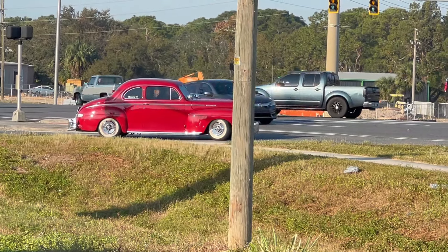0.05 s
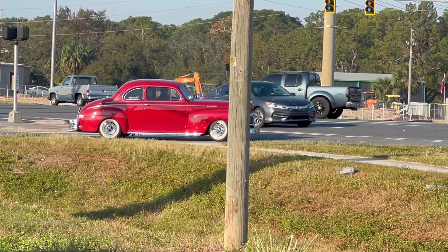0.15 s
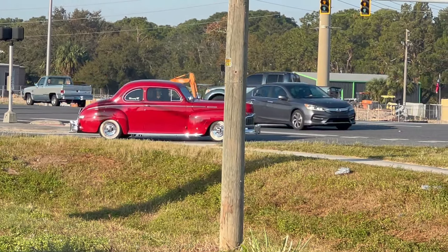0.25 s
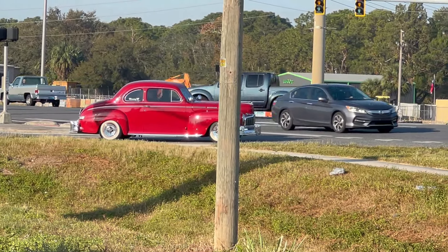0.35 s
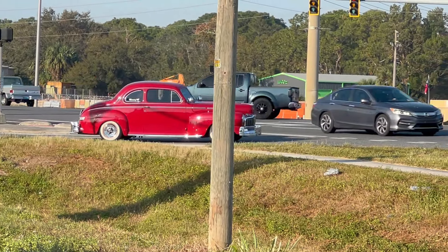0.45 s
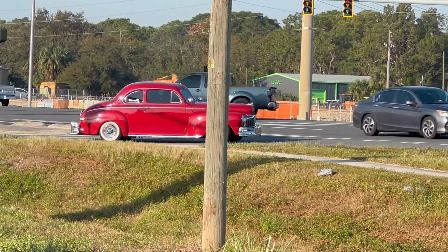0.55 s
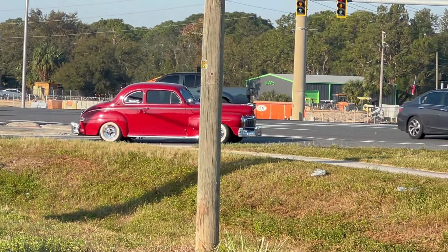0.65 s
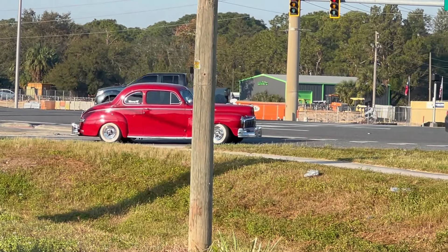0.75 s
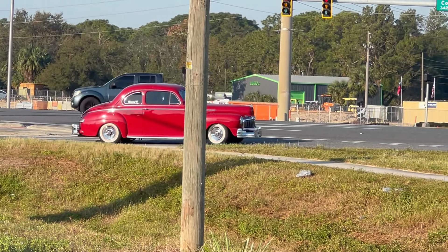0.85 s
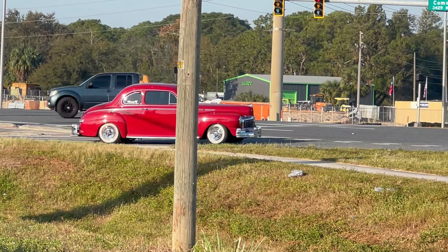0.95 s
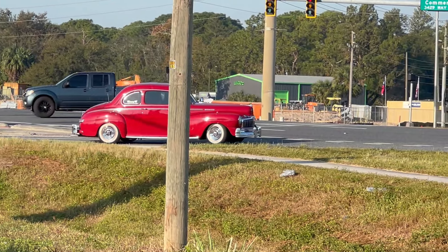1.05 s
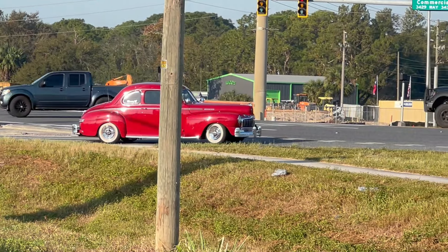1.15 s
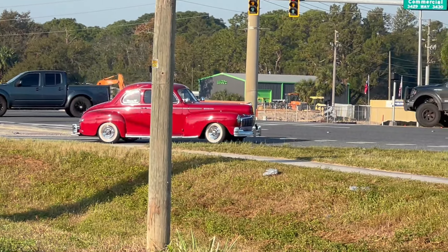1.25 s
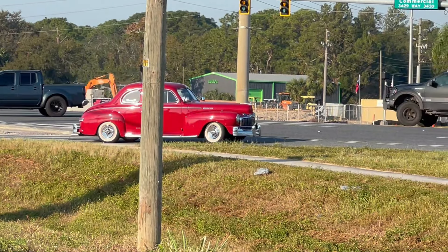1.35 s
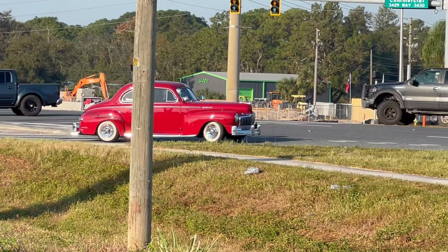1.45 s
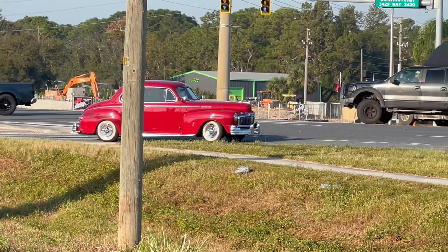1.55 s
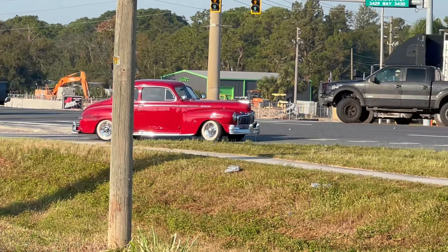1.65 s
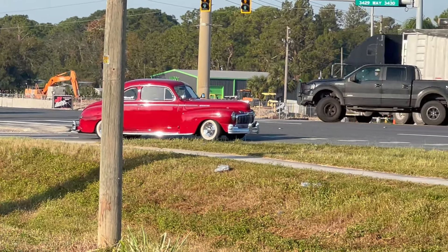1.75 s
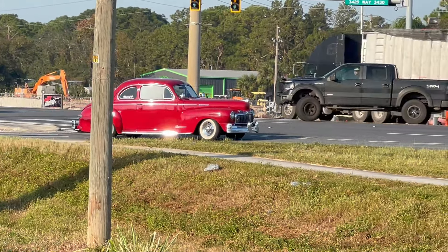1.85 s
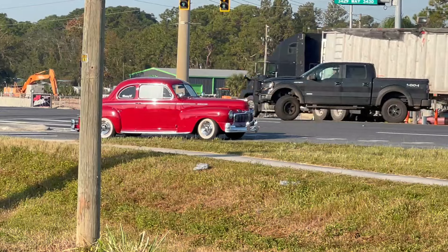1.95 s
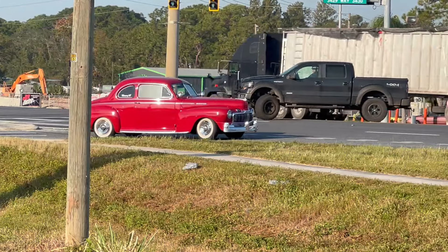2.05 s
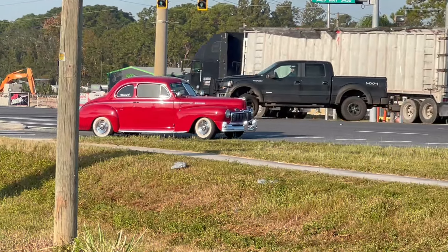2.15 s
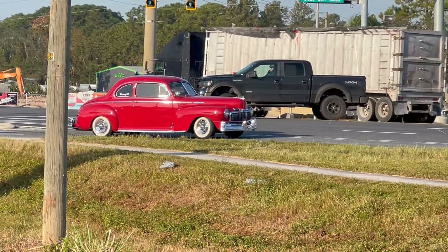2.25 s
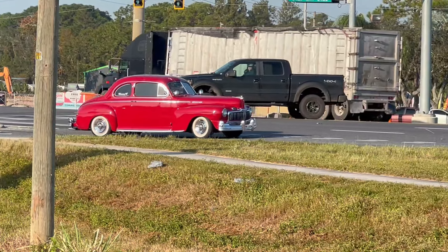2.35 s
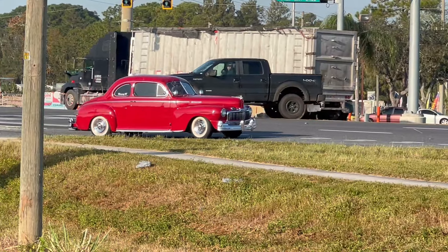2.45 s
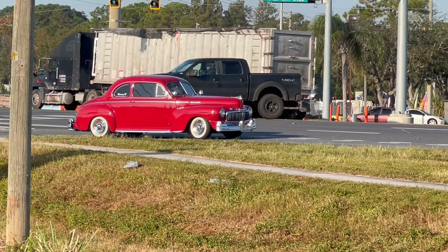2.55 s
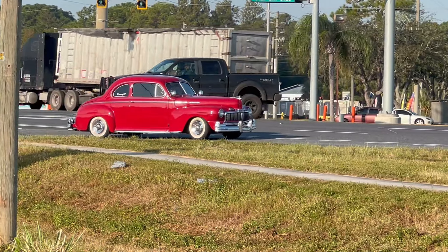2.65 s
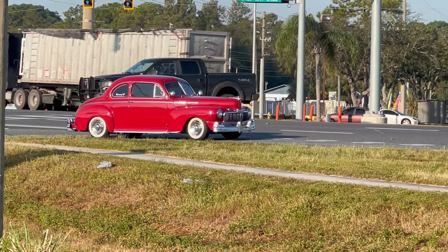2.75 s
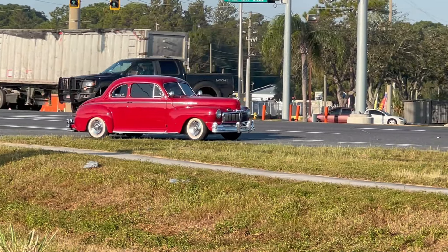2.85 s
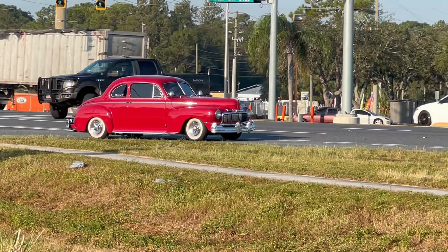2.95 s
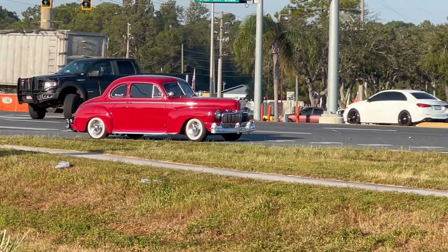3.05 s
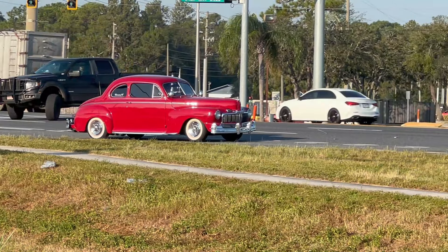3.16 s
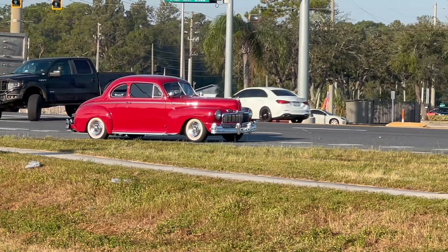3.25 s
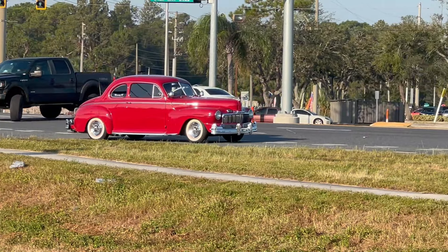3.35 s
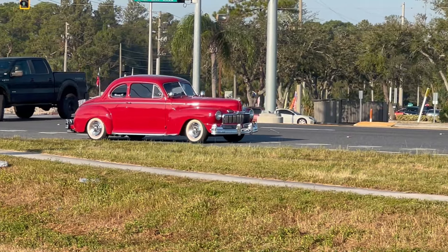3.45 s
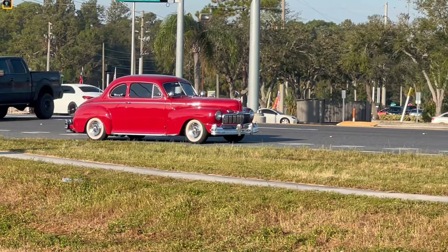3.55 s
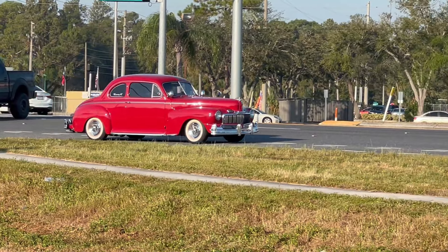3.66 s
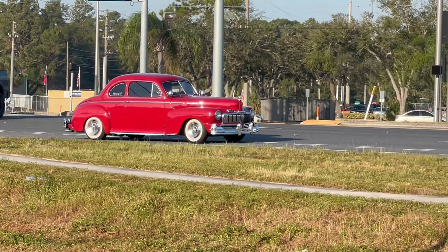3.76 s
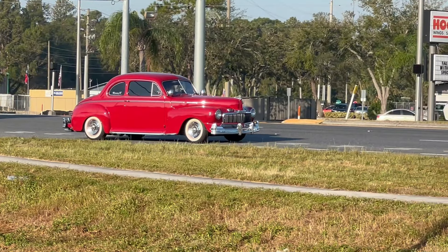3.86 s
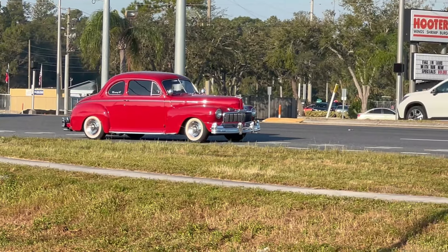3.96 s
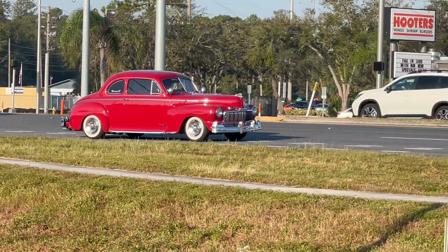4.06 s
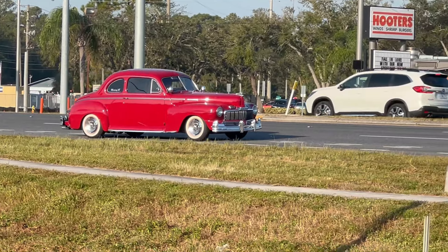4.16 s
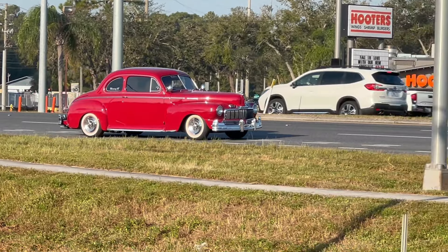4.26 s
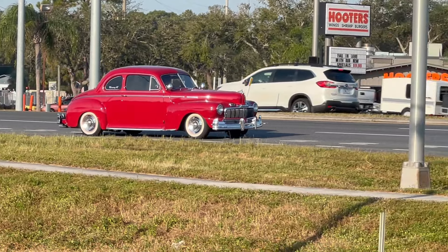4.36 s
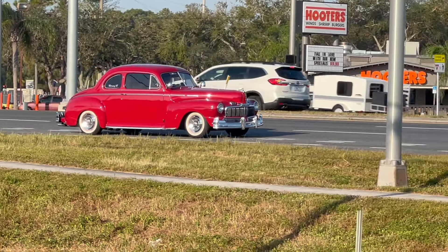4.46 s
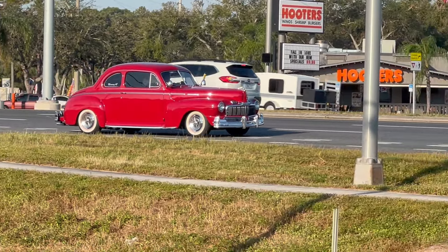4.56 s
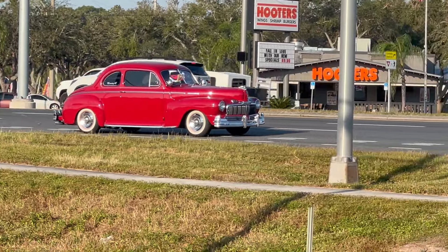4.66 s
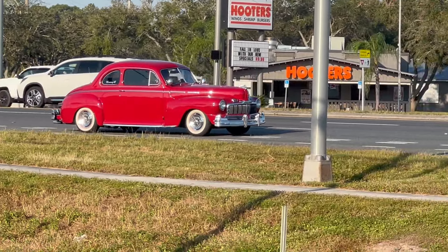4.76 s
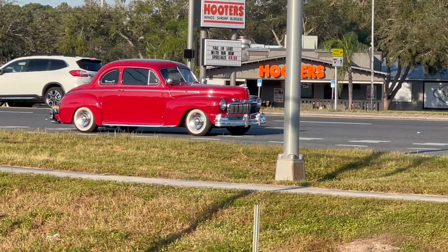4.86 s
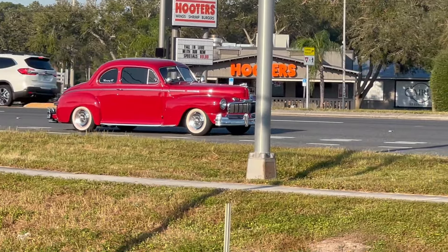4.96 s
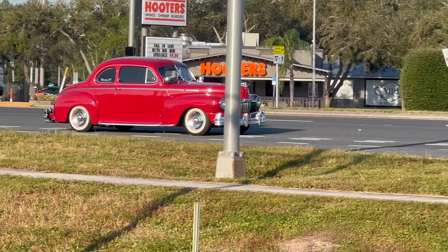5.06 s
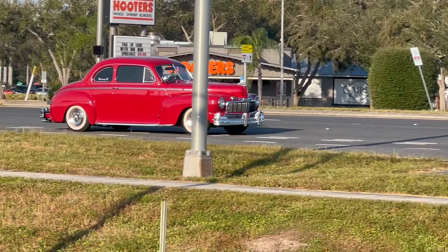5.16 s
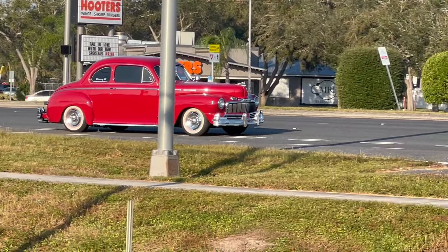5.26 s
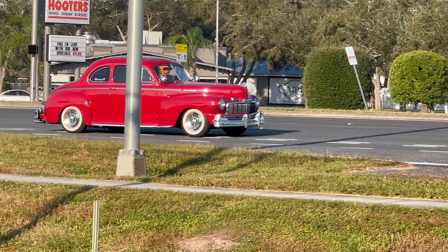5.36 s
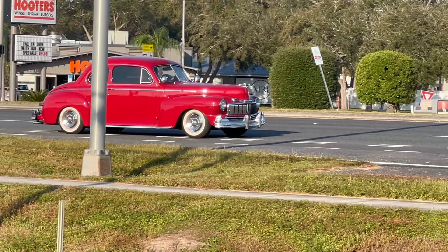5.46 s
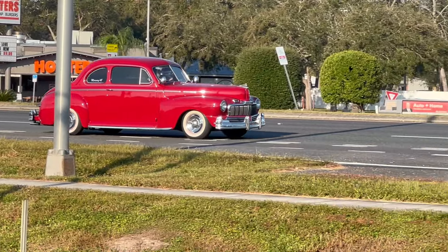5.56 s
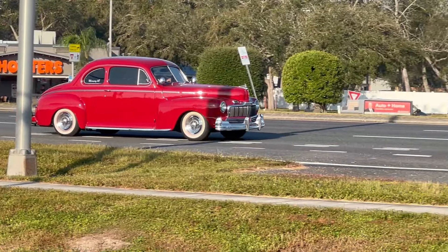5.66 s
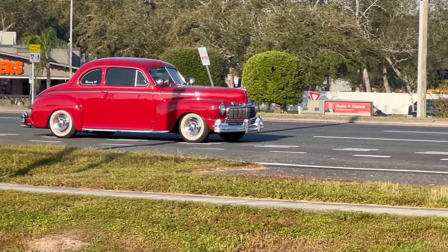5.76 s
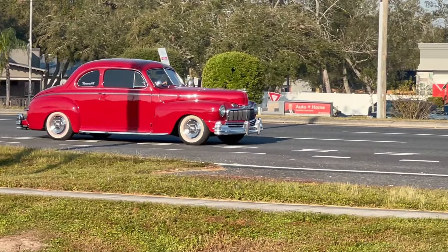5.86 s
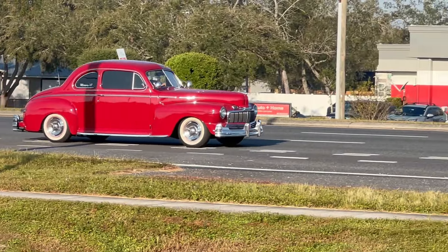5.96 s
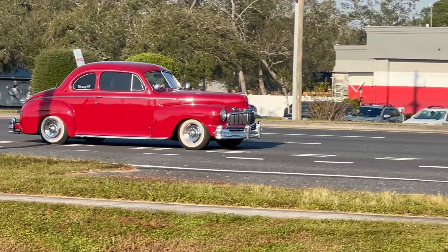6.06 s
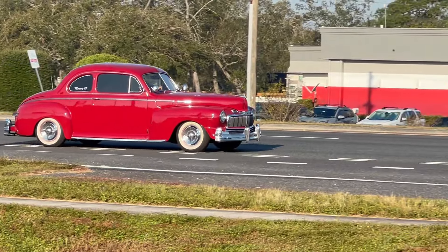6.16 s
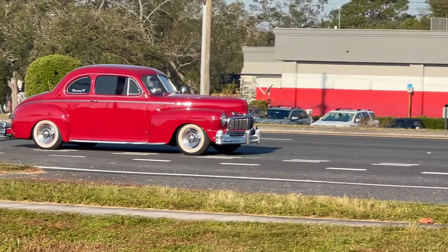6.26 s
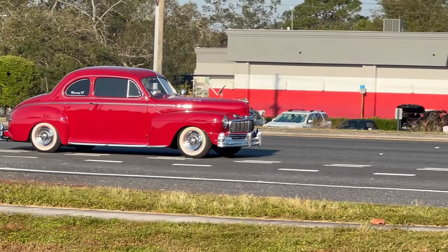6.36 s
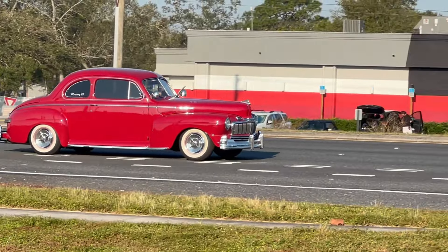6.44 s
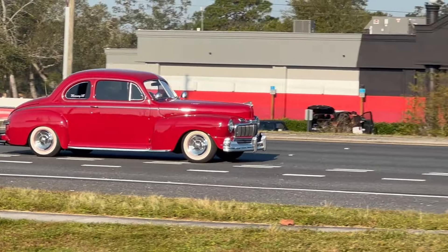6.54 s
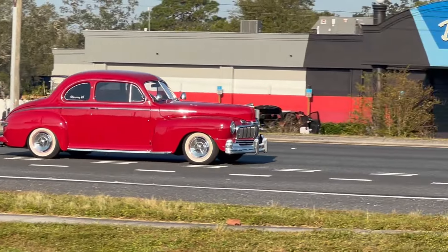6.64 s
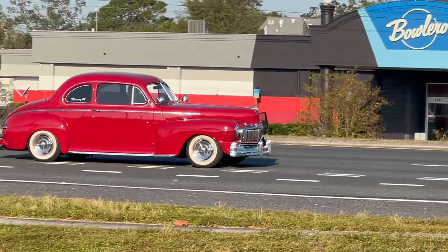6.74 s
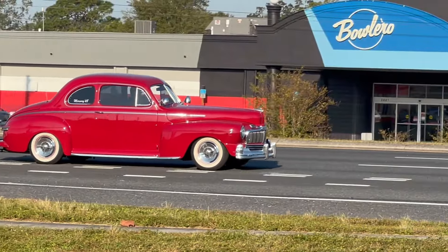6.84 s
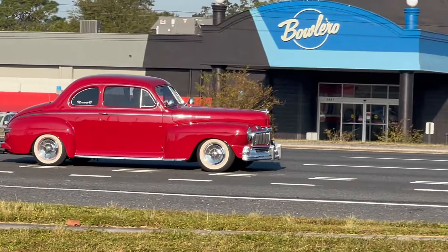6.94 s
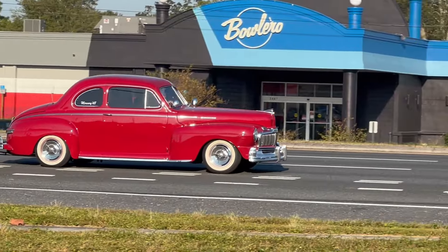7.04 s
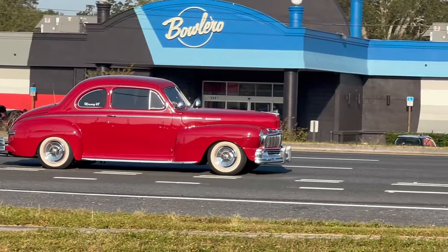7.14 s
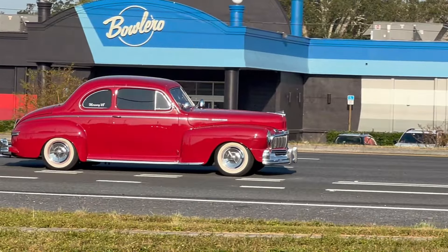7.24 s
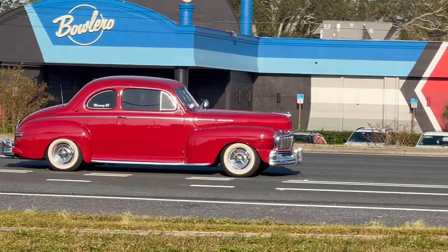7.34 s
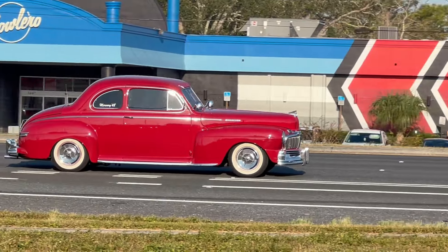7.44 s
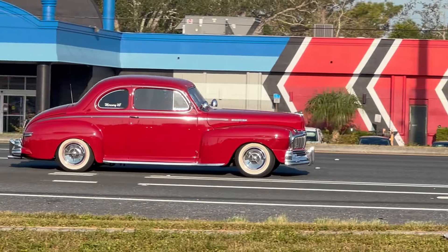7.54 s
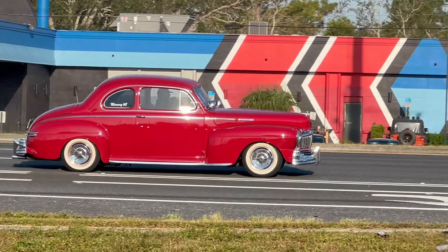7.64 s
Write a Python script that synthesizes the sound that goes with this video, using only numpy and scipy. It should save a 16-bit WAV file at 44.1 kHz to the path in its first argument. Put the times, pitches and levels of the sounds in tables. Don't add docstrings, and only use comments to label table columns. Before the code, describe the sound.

Open-air busy road, heard from the grass verge through a small stereo phone. From 0 s vehicles cross in broad low whooshes, around 0.2, 1, 1.9 and more faintly 3.1 and 4.3 s, with lorry hums, a tiny belt squeak at the start, jingling loose metal, fine chain ticks and dull wheel thuds near 0.75, 1.0, 3.4 and 3.5 s, the later ones leftward. An old eight-cylinder car burbles softly underneath, then opens its throttle at about 2.4 s; the deep boom climbs, dips around 4.1 s, climbs again to 5.4 s, dips briefly and rises. The rattles clear after 4 s and fine tyre fizz grows around 5 s. Near 5.9 s the exhaust turns toward us: rapid uneven cracks, sharpest at 6.1 s, then duller, with a hollow bark. Another engine's low drone climbs behind from 5 s. Everything is loudest and nearest at about 7.7 s, without fading.

```python
import sys
import numpy as np
from scipy import signal
from scipy.fft import rfft, irfft, next_fast_len
from scipy.io import wavfile
from scipy.ndimage import uniform_filter1d

SR = 44100
rng = np.random.default_rng(int(sys.argv[2]) if len(sys.argv) > 2 else 0)


def dump(signal):
    limited = np.clip(np.atleast_2d(signal).T, -1, 1)
    pcm = np.round(limited * 32767).astype(np.int16)
    wavfile.write(sys.argv[1], SR, pcm)


def how_loud(loudness_db):
    steps = np.asarray(loudness_db, float) / 20
    return 10 ** steps


N = 339570

# pitch_hz, level_db
RUMBLE = [(25, -32), (40, -1), (55, 18.5), (100, 9.5), (170, 3), (230, -10), (400, -4.5), (700, -32.5),
          (1000, -65)]
ROAR = [(150, -37), (250, -18), (267, -21), (302, -30), (372, -9), (402, -3), (611, -0.5), (738, -2.5),
        (994, -4.5), (2630, -27), (3500, -46), (4550, -41), (7700, -120)]
HISS = [(1500, -25), (2500, -5), (3400, 3.5), (4500, -6), (6000, -5.5), (7400, -3), (8500, -2), (10000, -1),
        (12000, -57), (15000, -27)]
FIZZ = [(7000, -2.5), (9000, 0.5), (10500, 1), (12000, -2.5), (13500, -4.5), (15500, -5), (16500, -48)]
# pitch_hz, likeness
SAME = [(60, 1.), (250, .97), (500, .62), (1000, .7), (1750, .88), (5000, .9), (8000, .85), (14600, .75)]
# nearest_s, passing_time_s, roar_db
PASSES = [
    (.2, 0.54, -36),
    (.95, 0.46, -34.5),
    (1.9, 0.92, -34),
    (3.1, 0.49, -41),
    (4.3, 0.88, -43),
]
FAR_ROAR_DB = -41
OWN_ROAR_DB, OWN_SHARE = -36, 1
RUMBLE_DB, RUMBLE_SHARE, RUMBLE_PASS_SHARE = -41.5, .1, .35
HISS_DB, HISS_SHARE = -47.5, 0.56
FIZZ_DB, FIZZ_RISE_DB, FIZZ_S, FIZZ_SPAN_S = -65.5, 12.5, 5.14, 0.41

# start_s, end_s, pitch_hz, width_hz, level_db
HUMS = [
    (0, 1.6, 48, 0.24, -28.5),
    (3, 4.2, 43, 2, -31),
    (0, 0.59, 61, 2.8, -36),
    (.8, 1.44, 55, 1.4, -28.5),
    (1.42, 2.6, 55, 2.6, -28),
    (.4, 1, 134, 1.7, -45),
    (0, 0.69, 405, 3.2, -41.5),
    (0.93, 2.25, 598, 25, -42.5),
    (0.1, 0.63, 9700, 66, -77),
    (0.76, 1.2, 15000, 300, -76),
]
# start_s, end_s, pitch_hz, width_hz, level_db
RUSTLE = [
    (3.62, 4.02, 3450, 350, -54),
    (3.72, 3.87, 3100, 1000, -50),
    (2.2, 2.6, 3900, 1800, -53),
    (2.9, 3, 3500, 1400, -57),
    (1.2, 2.2, 4100, 670, -56.5),
    (1.1, 1.19, 6100, 1000, -54),
    (1.7, 2.4, 1950, 300, -51.5),
    (2.7, 3.35, 4500, 360, -55.5),
]
# pitch_hz, width_hz, level_db
CRACKLE = [(2900, 340, -6), (3500, 600, 1), (5200, 1200, -4)]
CRACKLE_PER_S, CRACKLE_DB = 90, -61.5
# pitch_hz, width_hz, level_db
GRIT = [(12300, 1500, -3), (14000, 1800, -2)]
GRIT_PER_S, GRIT_DB = 90, -9

# start_s, peak_db, pitch_hz
TICKS = [(0.1491, -37, 6460), (0.3205, -41, 4530), (0.6619, -41, 4590), (0.7433, -38, 4300),
         (0.9882, -37, 5140), (1.0315, -31, 6450), (1.0345, -39.5, 4900), (1.0745, -36.5, 5500),
         (1.1414, -49, 4440), (1.283, -42, 6110), (1.954, -41, 5750), (1.994, -44, 5150),
         (2.2029, -39, 4760), (2.286, -36, 4780), (2.3701, -37, 5100), (2.41, -37, 5800),
         (2.4933, -36, 5520), (2.9931, -41, 4960), (3.034, -39, 5400), (3.1164, -42, 4740),
         (3.2825, -41, 5220), (3.3039, -37, 5270), (3.3229, -41, 5450), (3.7399, -42, 4710),
         (3.7804, -38, 4600), (3.7988, -35, 5100), (3.8632, -39, 4900)]
# start_s, peak_db, pitch_hz
CLINKS = [(0.038, -26.5, 3020), (0.1053, -29, 3300), (0.168, -34, 3550), (0.2738, -40, 3050),
          (0.293, -33, 2960), (0.4187, -32, 3090), (0.5457, -35, 3080), (0.6085, -43, 3020),
          (0.715, -30, 3100), (0.741, -29, 3570), (0.9243, -33, 2760), (0.9657, -35, 2900),
          (1.0075, -28, 3050), (1.033, -27, 3600), (1.1354, -31, 3470), (1.2815, -47, 3470),
          (1.5953, -27.5, 3350), (1.9934, -30, 3540), (2.0345, -33, 3500), (2.307, -28.5, 3700),
          (2.3657, -31, 2940), (2.408, -29, 5630), (2.6643, -35, 3320), (2.9888, -28.5, 3300),
          (3.035, -34, 3190), (3.1167, -29, 3300), (3.241, -31.5, 3200), (3.299, -32, 3180),
          (3.3203, -28.5, 3570), (3.7043, -28.5, 3330), (3.74, -37, 3050), (3.775, -30, 3560),
          (3.796, -23.5, 3230), (3.8567, -26.5, 2900), (3.9, -29, 3500), (3.982, -30, 3220),
          (4.838, -30, 2980)]
# start_s, peak_db, left_minus_right_db, pitch_hz
BUMPS = [
    (0.748, -19, 6, 594),
    (1.036, -12.5, 5, 596),
    (3.424, -14.5, 9.5, 800),
    (3.542, -13, 9.5, 600),
]
# first_hz, last_hz, level_db
SQUEAK = [(2050, 2115, -2.5), (3100, 3800, -15)]
SQUEAK_S, SQUEAK_LENGTH_S, SQUEAKS_PER_S, SQUEAK_DB = .05, .44, 47, -40.5

# time_s, firing_hz, level_db
FOLLOWER = [
    (5.0, 47.6, -34),
    (5.5, 49.2, -28),
    (5.8, 50.4, -24),
    (6.4, 52.3, -23),
    (7.0, 54.3, -22),
    (7.7, 57.3, -21),
]
# order, level_db
FOLLOWER_ORDERS = [(1, -11), (2, 0), (3, -14), (4, -28)]

# time_s, cycles_hz
SPEED = [(0.0, 10.72), (0.6, 10.28), (1.2, 10.93), (2.0, 11.3), (2.3, 12.24), (2.7, 15.0), (3.3, 16.05),
         (3.85, 16.75), (4.07, 15.0), (4.25, 15.26), (4.7, 17.48), (5.42, 18.72), (5.68, 17.76),
         (5.9, 18.33), (6.15, 19.6), (6.9, 19.81), (7.3, 20.25), (7.7, 20.31)]
# time_s, nearness_db
NEAR = [
    (0, -11.5),
    (2.4, -12.5),
    (4.1, -11.5),
    (5.3, -7),
    (6.05, -3),
    (6.8, -1.5),
    (7.7, 1),
]
# order, level_db, change_db once the pipe faces us
UNEVEN = [(3, -10.5, 0), (4, -7, 0), (5, 3.5, 0), (6, -2, 3), (7, -2, -10), (9, -3, -2.5), (10, -10, -18),
          (11, -2, -12), (13, -1.5, 0)]
# pitch_hz, level_db
SILENCER = [(40, -40), (55, -3.5), (80, -1.5), (100, -0.5), (125, -17.5), (165, 4), (200, -4), (217, -13.5),
            (235, -42)]
# order, level_db, sign, pointing_away_db, coming_level_db
BARK = [(12, -16, 1, -7, 5), (13, -21.5, 1, -8, 9), (14, -16.5, 1, -2, 2), (15, -9.5, -1, 6.5, 2),
        (16, -13.5, -1, 5, -2.5), (17, -4, 1, -15, 0.5), (18, -3, 1, -2, -3.5), (19, -1, 1, -12, -8),
        (20, -5, 1, 1.5, 0), (21, -17, -1, 13, 7), (22, -20, 1, 9, 13.5), (23, -25, 1, -3, 16),
        (24, -17.5, 1, 10, -6), (26, -11, -1, 3, -8), (29, -11, 1, -6, -11), (31, -10, 1, 6, -9)]
# share_of_cycle, level_db
FIRINGS = [
    (0, 0),
    (.217, -7),
    (.358, -7),
    (.56, -14),
    (.605, -14),
    (.78, -15),
]
# pitch_hz, width_hz, level_db
TAIL_PIPE = [(1390, 86, -4), (1750, 650, 6.5), (2390, 840, -3.5), (3500, 1220, -8.5)]
# time_s, sharpness_db
EDGE = [
    (5.9, 1),
    (6.1, 9),
    (6.25, 2),
    (6.4, -6.5),
    (7.05, -4.5),
    (7.2, -2.5),
    (7.7, 0),
]
# pitch_hz, width_hz, level_db
BODY = [(580, 146, -0.5), (695, 170, -1.5), (815, 230, -2), (1040, 230, -3.5)]
# pitch_hz, width_hz, level_db
DRUM = [(277, 50, -2), (388, 91, -0.5)]
FIRING_S = 6.3114
PULL_S, PULL_SPAN_S, COAST_DB = 2.36, 0.054, -8
FACE_S, FACE_SPAN_S = 5.894, 0.082
LEVEL_S, LEVEL_SPAN_S = 6.72, 0.08
EASE_S, EASE_DB = 4.97, -4.5
BOOM_DB, EVEN_DB, BARK_DB, CRACK_DB, DRUM_DB = -19.5, -29.5, -31, -39, -35.5
EVEN_SHARE, BARK_SHARE, CRACK_SHARE = 0.14, 1.4, 1.5
EVEN_LOAD_DB = -5.5
BARK_AWAY_DB, CRACK_AWAY_DB, DRUM_AWAY_DB = -3, -18.5, -3.5
BODY_DB, BODY_SHARE = 6, 1.15
EVEN_LEAD, BARK_LEAD = 2 * np.pi * .13, 2 * np.pi * .011
UNEVEN_DB, COLOUR_DB = .9, 2.2
WEAK_FADE = .1
GUST_S, SWIRL = .01, .052
GROUND_S, GROUND_SHRINK_S, GROUND_SHARE = .00038, .000037, .35

# pitch_hz, lead_radians
LEAD = [(60, .08), (150, .2), (400, .2), (1600, .7), (4600, .3), (7300, 0), (9350, -2.9), (10900, -3.6),
        (12600, -6.1), (15500, -7.9)]
# pitch_hz, left_minus_right_db
LEAN = [(60, -.5), (200, -1.3), (380, -.5), (700, .8), (1300, 1.8), (1900, 0), (16000, 0)]
# pitch_hz, level_db
NULL = [(9000, 0), (9400, -12), (9700, -45), (10350, -45), (10600, -13), (11000, 0)]
# from_hz, to_hz
MONO = [(1900, 2650), (5200, 5650), (6050, 7300), (12500, 14300)]


def evened(x):
    return x / np.sqrt(np.mean(x ** 2) + 1e-20)


def read(points, hz):
    f, value = np.transpose(points)
    return np.interp(np.log(hz + 1), np.log(f + 1), value)


def curves(rows, t):
    s, *columns = np.transpose(rows)
    return [np.interp(t, s, c) for c in columns]


def drift(smooth_s, length=N):
    span = max(int(smooth_s * SR), 1)
    return evened(uniform_filter1d(uniform_filter1d(rng.standard_normal(length), span), span))


def step(t, at_s, span_s):
    return .5 + .5 * np.tanh((t - at_s) / (2 * span_s))


def resonate(x, hz, width):
    r = np.exp(-np.pi * width / SR)
    return signal.lfilter([1 - r, 0, r - 1], [1, -2 * r * np.cos(2 * np.pi * hz / SR), r * r], x)


def ring(x, modes):
    total = 0
    for hz, width, db in modes:
        once = resonate(x, hz, 1.6 * width)
        total = total + how_loud(db) * resonate(once, hz, 1.6 * width) / np.sqrt(width)
    return evened(total)


def add(mix, s, sound):
    part = mix[..., round(s * SR):][..., :sound.shape[-1]]
    part += sound[..., :part.shape[-1]]


def traffic_levels(t):
    near_db, = curves(NEAR, t)
    others = how_loud(FAR_ROAR_DB) ** 2
    for s, passing, db in PASSES:
        others = others + how_loud(db) ** 2 / (1 + ((t - s) / passing) ** 2) ** 2
    others_db = 10 * np.log10(others)
    roar_db = 10 * np.log10(others + how_loud(OWN_ROAR_DB + OWN_SHARE * near_db) ** 2)
    rumble_db = RUMBLE_DB + RUMBLE_PASS_SHARE * (others_db + 43.1) + RUMBLE_SHARE * (near_db + 31.5)
    hiss_db = HISS_DB + HISS_SHARE * (roar_db + 31.5)
    fizz_db = FIZZ_DB + FIZZ_RISE_DB * step(t, FIZZ_S, FIZZ_SPAN_S)
    return rumble_db, roar_db, hiss_db, fizz_db


def traffic():
    frames, hz = N // 256 + 5, np.fft.rfftfreq(1024, 1 / SR)
    a, b, c, d, patches = rng.standard_normal((frames, 513, 5)).T
    patches = evened(uniform_filter1d(uniform_filter1d(patches, 14, 0), 10, 1))
    flicker = rng.standard_normal((513, frames))
    flicker = evened(uniform_filter1d(uniform_filter1d(flicker, 160, 0), 2, 1))
    levels = traffic_levels(np.arange(frames) * 256 / SR)
    power = 0
    for shape, level_db, trim_db in zip((RUMBLE, ROAR, HISS, FIZZ), levels, (10.5, 1.06, 0.94, 6.0)):
        gain = how_loud(read(shape, hz))
        power = power + np.outer(gain / np.linalg.norm(gain), how_loud(level_db + trim_db)) ** 2
    octaves = np.clip(np.log2((hz + 1) / 900), 0, 1.3) * (hz < 3200)
    power *= how_loud(0.59 * np.outer(octaves, levels[1] + 39.5)) ** 2
    same = np.clip(read(SAME, hz), -1, 1)[:, None]
    left, other = a + 1j * b, c + 1j * d
    z = np.array([left, same * left + np.sqrt(1 - same ** 2) * other])
    flicker_db = 1.1 * np.clip(hz / 3000, 0, 1 + .8 * (hz > 11000))[:, None] * flicker
    z *= np.sqrt(power) * how_loud(0.84 * patches + flicker_db + 1.5)
    return signal.istft(z, nperseg=1024, noverlap=768)[1][:, :N]


def hums():
    out = np.zeros(N)
    for start, end, hz, width, db in HUMS + RUSTLE:
        length = int((end - start) * SR)
        pitch = hz + width * drift(0.307 / width, length)
        note = np.sqrt(2) * np.cos(2 * np.pi * np.cumsum(pitch) / SR)
        level = how_loud(db + 3.3 * drift(0.55 / width, length))
        add(out, start, level * note * signal.windows.tukey(length, .4))
    return out


def specks(per_s, modes):
    size = how_loud(3 * np.minimum(rng.exponential(1, N), 4)) * (rng.random(N) < per_s / SR)
    which = rng.integers(0, len(modes), N)
    total = 0
    for k, (hz, width, db) in enumerate(modes):
        total = total + how_loud(db) * ring(size * (which == k), [(hz, width, 0)])
    return evened(total)


def grit():
    t = np.arange(N) / SR
    fizz_db = traffic_levels(t)[3]
    near_grit = how_loud(fizz_db + GRIT_DB) * specks(GRIT_PER_S, GRIT)
    crackle = how_loud(CRACKLE_DB) * (1 - step(t, 4.5, .2)) * specks(CRACKLE_PER_S, CRACKLE)
    return near_grit + crackle


def rattles():
    out, t = np.zeros((2, N)), np.arange(4000) / SR
    both = np.ones((2, 1))
    for s, db, hz in TICKS:
        tick = resonate(rng.standard_normal(len(t)) * how_loud(-60 * t / 0.041), hz, 600)
        add(out, s, how_loud(db - 0.5) * tick / abs(tick).max() * both)
    for s, db, hz in CLINKS:
        knocks = rng.standard_normal(len(t)) * how_loud(-60 * t / 0.06) * np.minimum(t / .004, 1)
        low = resonate(resonate(knocks, hz, 700), hz, 700)
        high = resonate(resonate(knocks, 1.53 * hz, 700), 1.53 * hz, 700)
        clink = low + .2 * high
        add(out, s, how_loud(db - 7.0) * clink / abs(clink).max() * both)
    for s, db, pan_db, hz in BUMPS:
        thud = resonate(resonate(rng.standard_normal((2, len(t))), hz, 0.4 * hz), 0.52 * hz, 2 * hz)
        thud = evened(thud + 2.0 * thud[::-1])
        thud = thud + np.sin(2 * np.pi * 235 * t) * [[1], [.4]]
        pan = how_loud([[pan_db / 2], [-pan_db / 2]])
        add(out, s, how_loud(db - 15.0 - 60 * t / 0.083) * pan * thud)
    return out


def belt():
    t, out = np.arange(0, SQUEAK_LENGTH_S, 1 / SR), np.zeros(N)
    strokes = t * SQUEAKS_PER_S
    strength = how_loud(1.8 * rng.standard_normal(64)[strokes.astype(int) % 64])
    beads = np.sin(np.pi * strokes) ** 4 * strength
    tone = 0
    for first_hz, last_hz, db in SQUEAK:
        hz = np.linspace(first_hz, last_hz, len(t))
        tone = tone + how_loud(db) * np.cos(2 * np.pi * np.cumsum(hz) / SR)
    add(out, SQUEAK_S, how_loud(SQUEAK_DB) * beads * tone)
    return out


def follower():
    t = np.arange(N) / SR
    hz, level_db = curves(FOLLOWER, t)
    phase = 2 * np.pi * np.cumsum(hz) / SR
    tone = 0
    for k, db in FOLLOWER_ORDERS:
        tone = tone + how_loud(db + 1.5 * drift(0.3)) * np.cos(k * phase)
    fade_in = np.clip((t - FOLLOWER[0][0]) / .3, 0, 1)
    return np.sqrt(2) * how_loud(level_db) * fade_in * tone


def exhaust_notes(t, turns, near_db, bark_db, away):
    hz, = curves(SPEED, t)
    load, level = step(t, PULL_S, PULL_SPAN_S), step(t, LEVEL_S, LEVEL_SPAN_S)
    boom_db = BOOM_DB + near_db + COAST_DB * (1 - load)
    even_db = EVEN_DB + EVEN_SHARE * near_db + EVEN_LOAD_DB * (load - .5)
    ease_db = EASE_DB * step(t, EASE_S, 0.035)
    lagged = 2 * np.pi * (turns - .06)
    aligned = 2 * np.pi * (turns - .006)
    waver = [drift(0.14) for _ in range(4)]
    out = how_loud(even_db + 0.68 * waver[0]) * np.cos(8 * aligned + EVEN_LEAD)
    for k, db, facing_db in UNEVEN:
        order_db = boom_db + db + facing_db * (1 - away) + read(SILENCER, k * hz)
        order_db = order_db + ease_db * (k > 10) + .8 * waver[k % 4]
        out += how_loud(order_db) * np.cos(k * aligned)
    for k, db, sign, away_db, level_db in BARK:
        order_db = bark_db + db + away_db * away + level_db * level + 2.5 * waver[k % 4]
        out -= sign * how_loud(order_db) * np.sin(k * (lagged + BARK_LEAD))
    return np.sqrt(2) * out


def firing_blows(turns, near_db):
    blows, colour = np.zeros(N), np.zeros((4, N))
    for share, db in FIRINGS:
        at = np.flatnonzero(np.diff(np.floor(turns - share)))
        chance = np.clip(rng.standard_normal((len(at), 6)), -1.6, 1.6)
        at = np.clip(at + (3 * chance[:, 0]).astype(int), 0, N - 1)
        colour[:, at] = how_loud(COLOUR_DB * chance[:, 2:].T)
        fade = 1.05 - WEAK_FADE * np.maximum(near_db[at], -4)
        blows[at] = how_loud(db * fade + UNEVEN_DB * chance[:, 1])
    return blows, colour


def tail_pipe_crack(t, blows, colour, near_db):
    gust = signal.lfilter([1], [1, -np.exp(-1 / (GUST_S * SR))], blows)
    swirl = SWIRL * rng.standard_normal(N) * gust
    edge_db, = curves(EDGE, t)
    mouth = 0
    for k, (hz, width, db) in enumerate(TAIL_PIPE):
        struck = colour[k] * blows ** (1.15 + .27 * k) + swirl
        mouth = mouth + how_loud(db + edge_db * k / 3) * ring(struck, [(hz, width, 0)])
    pipe = 1.3 * evened(signal.sosfilt(signal.butter(6, 4000, fs=SR, output="sos"), mouth))
    echo = np.interp(t - GROUND_S + GROUND_SHRINK_S * np.maximum(near_db, -4), t, pipe)
    return GROUND_SHARE * echo - pipe


def old_car():
    t = np.arange(N) / SR
    hz, = curves(SPEED, t)
    near_db, = curves(NEAR, t)
    away = 1 - step(t, FACE_S, FACE_SPAN_S)
    turns = np.cumsum(hz) / SR
    turns -= turns[round(FIRING_S * SR)]
    bark_db = BARK_DB + BARK_SHARE * near_db + BARK_AWAY_DB * away
    crack_db = CRACK_DB + CRACK_SHARE * near_db + CRACK_AWAY_DB * away
    notes = exhaust_notes(t, turns, near_db, bark_db, away)
    blows, colour = firing_blows(turns, near_db)
    crack = tail_pipe_crack(t, blows, colour, near_db)
    body = how_loud(BODY_DB - BODY_SHARE * near_db) * np.roll(ring(blows ** .5, BODY), 14)
    drum_db = bark_db - BARK_DB + DRUM_DB + DRUM_AWAY_DB * away
    drum = -how_loud(drum_db) * ring(blows ** 1.02, DRUM)
    return notes + drum + how_loud(crack_db) * (crack + body)


def scene():
    return traffic() + hums() + grit() + rattles() + belt() + follower() + old_car()


def low_pass(x):
    return signal.sosfilt(signal.butter(12, 15790, fs=SR, output="sos"), x)


def record(dry):
    size = next_fast_len(N + 4096)
    hz = np.fft.rfftfreq(size, 1 / SR)
    wind_cut = 1 / np.sqrt(1 + (44 / (hz + 1)) ** 12)
    half = np.exp(.5j * read(LEAD, hz)) * how_loud(read(LEAN, hz) / 2)
    left, right = rfft(dry, size) * wind_cut * np.array([half, 1 / half])
    mid = (left + right) / 2 * how_loud(read(NULL, hz))
    centred = sum((hz > lo) & (hz < hi) for lo, hi in MONO)
    side = (left - right) / 2 * np.where(centred, how_loud(-25), 1)
    mix = irfft(np.array([mid + side, mid - side]), size)[:, :N]
    return low_pass(mix)


dry = scene()
out = record(dry)
dump(out)
```